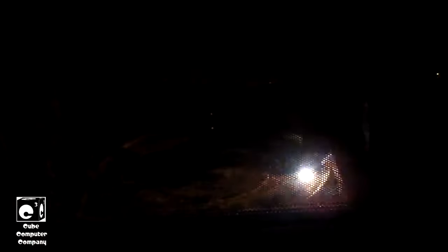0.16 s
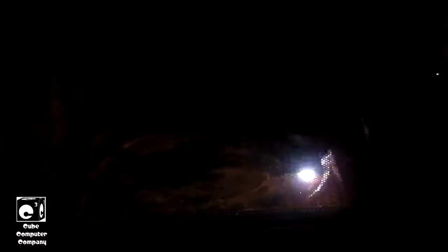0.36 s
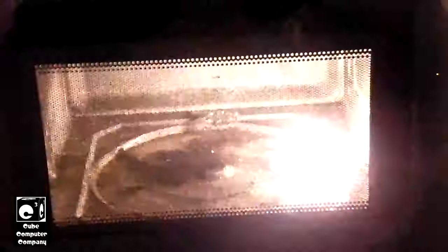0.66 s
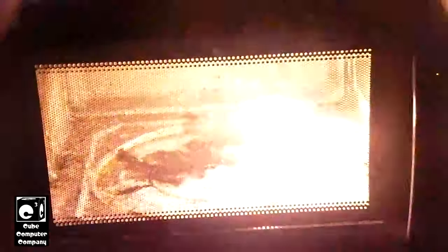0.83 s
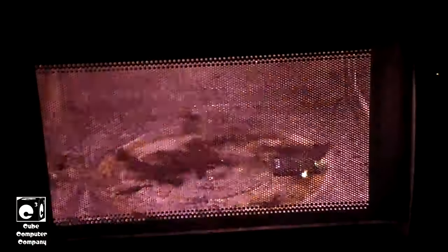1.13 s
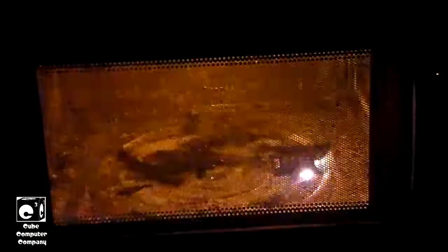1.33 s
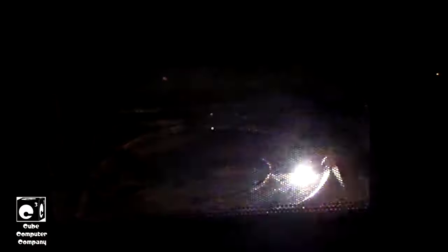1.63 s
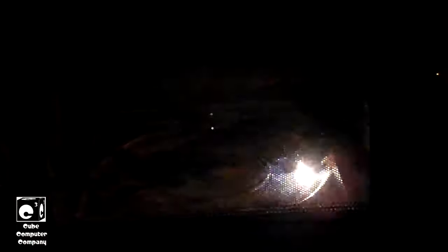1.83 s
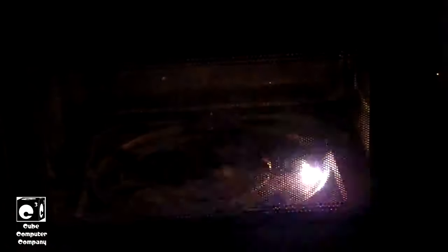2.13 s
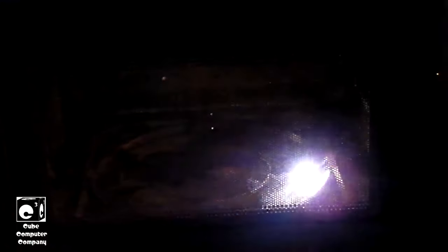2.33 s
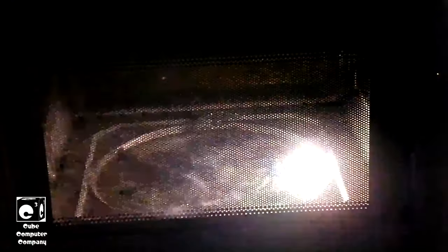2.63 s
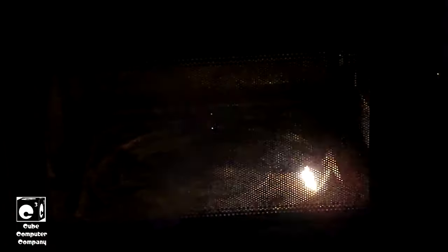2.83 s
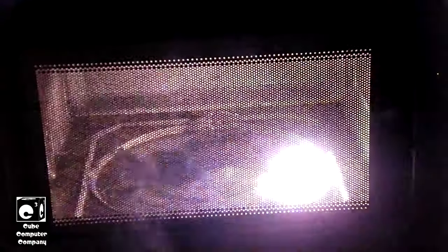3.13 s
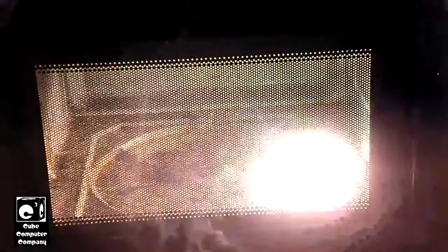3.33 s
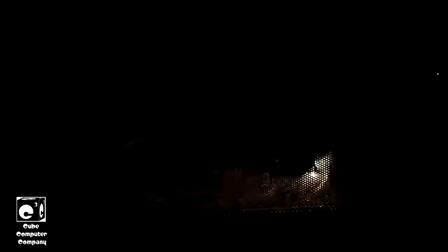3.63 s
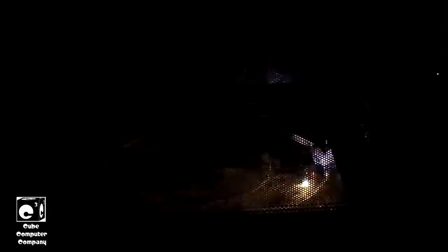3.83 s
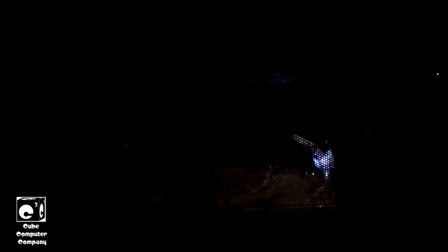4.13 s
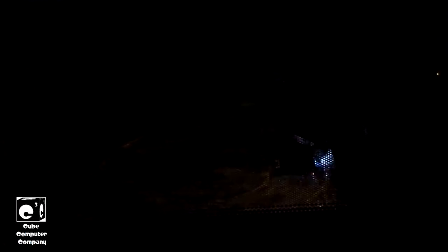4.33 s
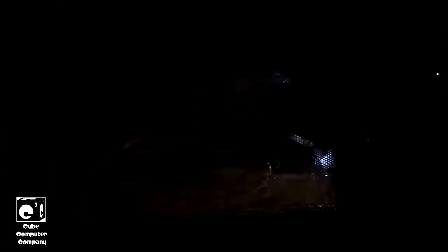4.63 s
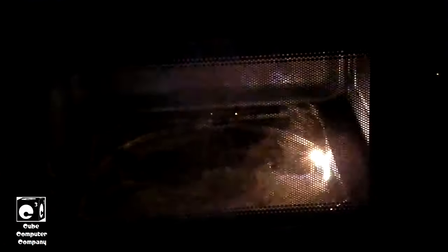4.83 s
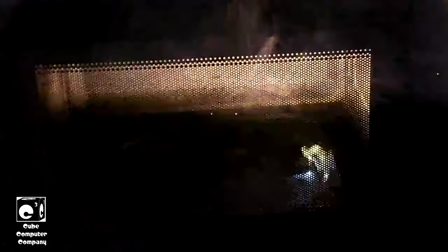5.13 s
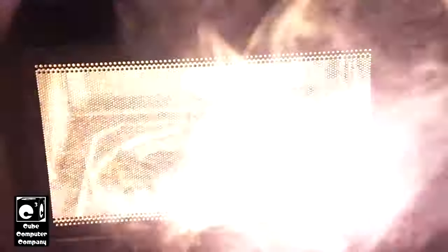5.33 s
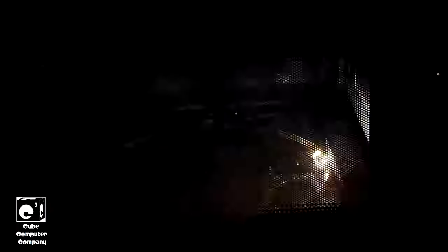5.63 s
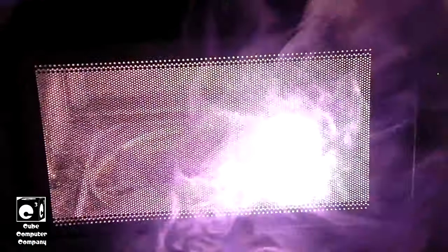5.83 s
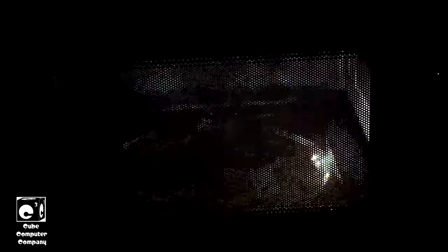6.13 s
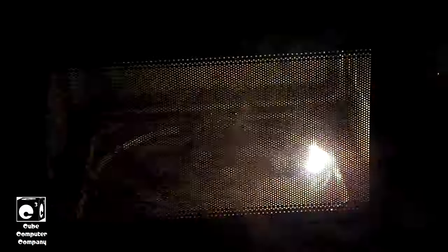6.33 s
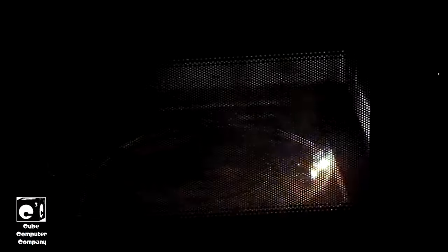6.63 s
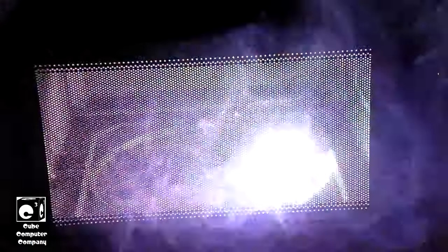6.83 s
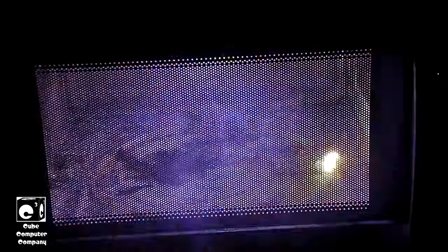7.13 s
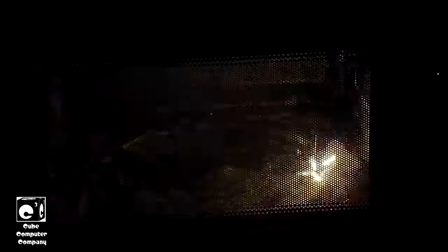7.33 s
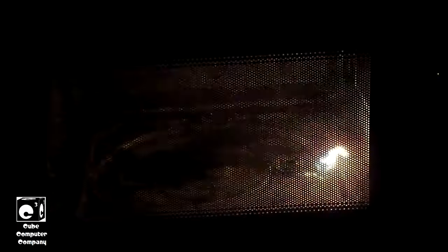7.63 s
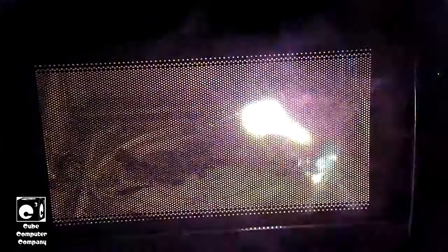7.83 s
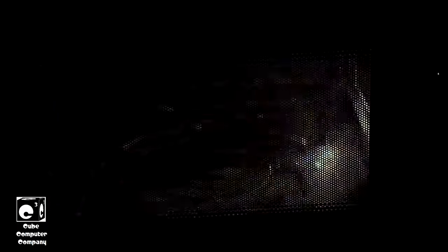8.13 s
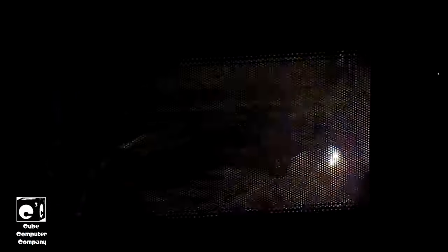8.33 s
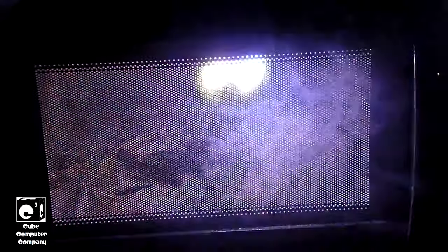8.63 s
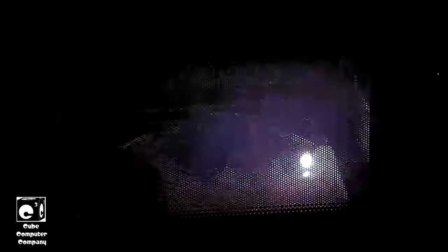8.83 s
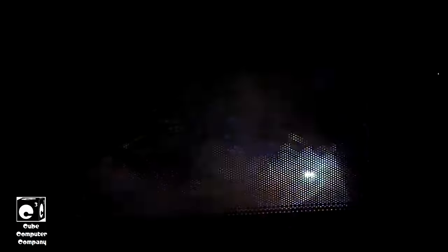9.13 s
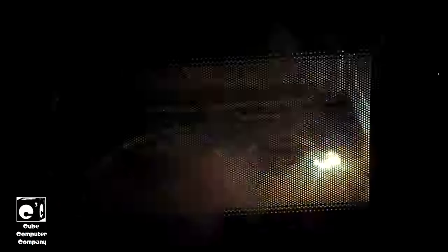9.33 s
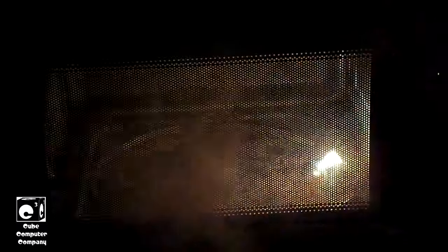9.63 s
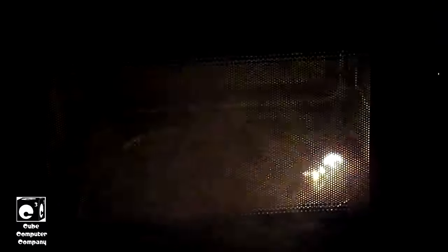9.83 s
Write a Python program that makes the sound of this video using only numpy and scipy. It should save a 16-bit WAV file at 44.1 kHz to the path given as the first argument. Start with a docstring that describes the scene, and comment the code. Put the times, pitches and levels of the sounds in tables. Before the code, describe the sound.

Metal arcs inside a running microwave oven, heard close to the door. From the start, bright sparks sizzle in a rapid pulse over a low fan hum, ringing briefly in the steel box. Loud, irregular cracks stand out as the arc falters and strikes again. Now and then a ball of plasma swells into a low electrical buzz, most often in the second half. Sparks and fan continue to the end.

```python
"""Metal arcs in a running microwave oven, heard close to the door by a small stereo microphone.
From the start the fan hums and sparks ring in the steel cavity, 60 bursts a second: the magnetron is on
for part of every mains cycle. From 0.3 s loud cracks stand out; the arc often starves and strikes again.
From 0.8 s to 8.8 s, now and then, a plasma ball swells once a cycle and buzzes.
Sparks and fan run on to the end at 10 s."""
import sys
import numpy as np
from scipy import signal
from scipy.fft import rfft, irfft
from scipy.io import wavfile
from scipy.ndimage import uniform_filter1d

SR = 44100
rng = np.random.default_rng(int(sys.argv[2]) if len(sys.argv) > 2 else 0)


def unload_wav(signal):
    """Save mono or channel-first audio to the path in sys.argv[1] as 16-bit WAV at rate SR, clipped to [-1, 1]."""
    wavfile.write(
        sys.argv[1],
        SR,
        np.round(np.clip(np.atleast_2d(signal).T, -1, 1) * 32767).astype(np.int16),
    )


N = 439677
TIME_S = np.arange(N) / SR

# arc strength (time [s], relative level [dB], treble gain [dB])
ARC_LEVELS = [(0.0, -15, 1.5), (0.55, -23, 3), (1.0, -13, -0.5), (1.2, -19.5, 0), (1.4, -15.5, 1.5),
              (1.66, -16, 3), (1.97, -24, 2.5), (2.3, -16, 4), (3.1, -23, 0), (3.45, -13.5, 1),
              (3.62, -26, -4), (3.9, -21, 5.5), (5.0, -14.5, 4), (5.5, -20.5, 1), (6.1, -16.5, 2),
              (6.34, -13, 2.5), (6.66, -21, 3), (6.85, -14, 1.5), (7.39, -15, 3.5), (7.7, -22, 3),
              (7.85, -16, 1.5), (8.94, -19, 1), (9.3, -14, 3.5), (9.5, -24, 4.5), (9.97, -18, 2)]
# strongest bursts, relative levels (time [s], upper band [dB], low band [dB], thump [dB])
CRACKS = [(0.324, -13, -29, -60), (0.409, -5, 2, -35), (0.445, -4.5, 1.5, -36), (0.625, -3, 4, -27),
          (0.6724, -11.5, -14, -46), (0.7743, -3.5, 10.5, -26), (0.859, -5.5, 5.5, -35),
          (0.91, -12, -15, -32), (1.108, -8, -17, -45), (1.2392, -11.5, 3.5, -31), (1.3403, -5, 5, -26),
          (1.36, -3, 6.5, -24.5), (1.5114, -20, 4.5, -37), (1.5272, -9, -22, -33), (1.9918, -7, 1, -37),
          (2.0232, -8.5, 0.1, -32), (2.2063, -7.5, -1, -41), (2.273, -8, -8, -51), (2.7759, -7.5, 4, -28.5),
          (2.9916, -11, -8, -37), (3.1556, -9, -10, -58), (3.225, -5, 2, -31), (3.2556, -12.5, 3.3, -41),
          (3.3744, -10, -2, -39), (3.407, -17, 0, -30), (3.5114, -5, 4.5, -22), (3.658, -11.5, -6, -36),
          (3.675, -8, -5, -31), (3.7907, -4.5, 2, -31.5), (3.826, -7.5, -4, -52), (3.8396, -8.5, -7, -43),
          (3.8744, -13, -5, -35.5), (3.925, -14.5, -19, -54), (3.994, -10, -17, -54),
          (4.026, -8.5, -22, -46), (4.043, -12, -24, -50), (4.074, -10.5, -27, -48), (4.1552, -8, -24, -57),
          (4.188, -9, -15, -56), (4.556, -10.5, -30, -58), (4.608, -6.5, 2.2, -38), (4.905, -6.5, 2, -30),
          (5.0392, -8.5, -18, -36), (5.1246, -9.5, -2, -46), (5.1556, -4.5, -18, -45),
          (5.207, -6.5, 6, -32), (5.2402, -7.5, 1, -28), (5.3729, -5, 8, -44), (5.4058, -13, 7, -31),
          (5.44, -5, -28, -33), (5.4898, -7.5, -4, -36), (5.6256, -8, 4.5, -42), (5.6577, -6, 4.5, -26),
          (5.726, -8, -25, -33), (5.8224, -6, 2.5, -30), (5.892, -4, 4, -33), (6.2413, -9, -18, -29),
          (6.293, -2, 4.5, -26.5), (6.3904, -5, 8, -19.5), (6.8918, -14, -1.5, -37),
          (6.9562, -0.5, 7.5, -44), (7.1422, -6.5, -17, -25.5), (7.2395, -15, -16, -35),
          (7.3572, -14, -3, -28), (7.443, -17, 5.5, -35.5), (7.7268, -8.5, -21, -53),
          (7.8078, -13, 2.5, -48), (7.8219, -2.5, 7.5, -59), (8.0094, -27, -18, -22),
          (8.2217, -22, -25, -56), (8.3435, -25, -24, -57), (8.391, -7, -8, -52), (8.523, -9, 4, -49),
          (8.554, -5.5, 7.5, -41), (8.6747, -7.5, -8, -32), (8.8083, -7, -9, -36), (8.9729, -1.5, 8.5, -32),
          (9.0403, -3, -3, -34), (9.1243, -5, -17, -56), (9.2084, -21, -19, -56), (9.3893, -13, -25, -61),
          (9.5235, -10.5, -5, -44), (9.823, -7, -2.5, -52), (9.8583, -5, 1, -38)]
# ramps before a new strike (strike time [s], length [s], level change reached [dB])
LULLS = [(0.405, 0.082, 1.5), (0.62, 0.08, 3.5), (0.785, 0.028, -9), (0.85, 0.063, -2.5),
         (1.1, 0.079, -18.5), (1.312, 0.15, -9), (2.195, 0.1, -4.5), (3.224, 0.035, 0), (3.375, 0.07, -10),
         (3.788, 0.06, -17), (3.977, 0.037, -4), (4.144, 0.16, -5.5), (4.6, 0.092, -15), (5.155, 0.02, -7),
         (5.445, 0.044, -22), (5.627, 0.05, -10), (5.887, 0.035, -8), (6.058, 0.045, -14),
         (6.947, 0.027, -11), (7.804, 0.044, -19), (8.213, 0.066, -8.5), (8.33, 0.075, -13),
         (7.724, 0.055, -4), (8.506, 0.08, -7), (9.038, 0.04, -8), (8.664, 0.081, -6.5), (8.812, 0.04, -35),
         (9.119, 0.04, -10), (9.397, 0.057, -27), (9.832, 0.38, -3), (3.307, 0.054, -8), (1.23, 0.064, 1),
         (2.986, 0.28, -1.5), (5.823, 0.065, 1)]
# spark spectrum (frequency [Hz], relative density [dB])
SPARK_SPECTRUM = [(180, -36.5), (300, -26.5), (762, -22.5), (828, -22), (1060, -22.5), (1320, -21),
                  (2170, -11.5), (2930, -12), (3400, -3), (4830, -0.5), (7690, -4), (12900, -3.5),
                  (16000, -7)]
# plasma balls (start [s], length [s], buzz level [dB], drift over length [dB], upper harmonic gain [dB])
PLASMA_BALLS = [(0.805, 0.56, -25, -7.5, -4.5), (1.347, 0.17, -27.5, -6.5, 2), (1.996, 0.076, -29.5, -6, 7),
                (3.24, 0.14, -23, -3.5, 0.5), (3.426, 0.15, -25.5, 4.5, -3.5), (5.165, 0.1, -31, -9, -13),
                (5.373, 0.058, -20.5, -4, -14), (5.449, 0.15, -31, 10, 0.5), (5.929, 0.33, -21.5, -1, -3.5),
                (6.348, 0.086, -24, -1, -5), (7.006, 0.33, -24, -5.5, -5), (7.296, 0.17, -19.5, -10.5, 3),
                (7.831, 0.17, -24, -6.5, 1.5), (7.996, 0.065, -18.5, -6, 2.5), (8.071, 0.14, -23.5, 0.1, 4),
                (8.579, 0.25, -18.5, -5, -3.5)]
# buzz spectrum (mains harmonic [1], relative level [dB])
BUZZ_HARMONICS = [(1, -10.5), (2, -4), (3, 6.5), (4, -4), (5, -12.5), (6, -24.5), (7, -28.5), (8, -14),
                  (9, -8.5), (10, -9.5), (11, -10.5), (12, -15.5), (13, -15.5), (14, -18.5), (15, -66),
                  (16, -21), (17, -12.5), (18, -34), (19, -26), (20, -42), (21, -47), (22, -15), (23, -20),
                  (24, -47), (25, -21), (26, -18), (27, -38), (28, -22), (29, -51), (30, -31), (31, -34),
                  (32, -18), (33, -29)]
# sharp modes of the steel box (frequency [Hz], width [Hz], gain [dB])
CAVITY_MODES = [(829.6, 18.6, 12), (1056, 16, 8.5), (1330, 130, 7), (1570, 7.1, 7), (2211, 51, 6),
                (2610, 115, 6), (2984, 173, 8), (3750, 94, 2), (4820, 210, 3), (6135, 290, 4.5)]
# cavity decay (frequency [Hz], T60 [s])
CAVITY_DECAY = [(300, 0.086), (2000, .11), (6000, 0.12), (14000, 0.12)]
# blade and transformer tones (frequency [Hz], rms level [dB])
FAN_TONES = [(120, -56.5), (170.3, -45), (240, -60.5), (511, -64), (600, -65), (720, -75)]
# rushing air (frequency [Hz], relative density [dB])
AIR_SPECTRUM = [(15, -83), (25, -3), (117, -5.5), (171, -2.5), (218, -2), (381, -13.5), (1190, -26.5),
                (1350, -38), (1490, -59), (3000, -10.5), (3900, -64), (6600, -120)]
# microphone port imbalance (frequency [Hz], left minus right [dB])
PORT_BALANCE = [(60, 11), (180, 11.5), (550, 10.5), (1650, 8), (4970, 1.0), (15000, -4)]

MAINS_HZ = 60.0


def arc():
    """Sparks surge while the magnetron is on; strength, strike moment and colour change every cycle."""
    cycles = TIME_S * MAINS_HZ
    cycle, phase = cycles.astype(int), cycles % 1
    strength, lateness, low_spread, treble_spread = rng.standard_normal((cycle[-1] + 1, 4)).T[:, cycle]
    strike_phase, quench_phase = 0.375 + 0.045 * abs(lateness), 0.93
    gate = np.clip((phase - strike_phase) / 0.09, 0, 1) * np.clip((quench_phase - phase) / 0.28, 0, 1)
    gate += 0.25  # hot metal fizzes on
    knots_s, level_db, treble_db = np.transpose(ARC_LEVELS)
    level_db, treble_db = np.interp(TIME_S, knots_s, level_db), np.interp(TIME_S, knots_s, treble_db)
    lull_db = starving_db(TIME_S)
    upper_level = gain_of(level_db + 2.4 * strength + lull_db) * gate
    # a plasma ball makes sparks fatter and duller; if the arc starves they fatten more and regain treble
    ball = np.max([ball_growth(TIME_S, start_s, length_s) for start_s, length_s, *_ in PLASMA_BALLS], 0)
    low_db = 3.5 + (7 - 0.35 * lull_db) * ball - 0.4 * treble_db  # bright sparks are thinner
    low_level = upper_level * gain_of(low_db + 1.5 * low_spread)
    treble_db += (-3.5 - 0.3 * lull_db) * ball + 1.8 * treble_spread
    # many small sparks, few large ones
    sparks = unit_rms(rng.standard_normal(N) * gain_of(2.72 * np.minimum(rng.exponential(1, N), 6)))
    sparks = unit_rms(coloured(sparks, lambda hz: curve_at(SPARK_SPECTRUM, hz)))
    low = signal.sosfilt(signal.butter(2, 2500, fs=SR, output="sos"), sparks)
    treble = signal.sosfilt(signal.butter(2, 8000, "high", fs=SR, output="sos"), sparks)
    upper = sparks - low + treble * (gain_of(treble_db) - 1)
    upper_crack, low_crack = crack_envelopes()
    return np.hypot(upper_level, upper_crack) * upper + np.hypot(low_level, low_crack) * low


def crack_envelopes(rise_s=0.00064, fall_s=0.0055):
    """Brief flares of the arc: upper and low band envelopes."""
    at_s, upper_db, low_db, _ = np.transpose(CRACKS)
    age_s = np.arange(700) / SR
    flare = (1 - np.exp(-age_s / rise_s)) * np.exp(-(age_s / fall_s) ** 2)
    return [signal.oaconvolve(impulses(at_s, gain_of(db)), flare)[:N] for db in (upper_db, low_db)]


def starving_db(time_s):
    """The arc starves: a level ramp, mostly downward, that resets at each strike."""
    return sum(np.interp(time_s, [strike_s - length_s, strike_s], [0, change_db], 0, 0)
               for strike_s, length_s, change_db in LULLS)


def plasma(edge_db=-15.5, sharpen_db_per_s=18, sputter_db=2.5, null_hz=390):
    """One flat-topped pressure pulse per cycle; cracks knock the same low modes."""
    pulse_s = (np.arange(int(N / SR * MAINS_HZ)) + 0.765) / MAINS_HZ
    count = len(pulse_s)
    low, upper = np.zeros((2, count))
    for start_s, length_s, buzz_db, drift_db, upper_db in PLASMA_BALLS:
        grown = ball_growth(pulse_s, start_s, length_s)
        age_s = np.clip(pulse_s - start_s, 0, length_s)
        buzz = (grown > 0) * gain_of(buzz_db + drift_db * age_s / length_s + edge_db * (1 - grown))
        low += buzz
        upper += buzz * gain_of(upper_db + sharpen_db_per_s * age_s)
    arc_db = np.interp(pulse_s, *np.transpose(ARC_LEVELS)[:2]) + starving_db(pulse_s)
    low += gain_of(arc_db - 36 + 5 * rng.standard_normal(count))  # the arc's own faint pulse
    wobble = gain_of(1.1 * rng.standard_normal((count, 2)).T)
    wobble *= gain_of(sputter_db * unit_rms(uniform_filter1d(rng.standard_normal(count), size=3)))
    harmonics = [(k * MAINS_HZ, db) for k, db in BUZZ_HARMONICS]
    colour_db = lambda hz: curve_at([(45, -67)] + harmonics + [(2500, -32), (5000, -29)], hz)
    train_rms = np.std(coloured(impulses(pulse_s, np.ones(count)), colour_db))
    hz = np.fft.rfftfreq(N, 1 / SR)
    low_spectrum, upper_spectrum = (rfft(impulses(pulse_s, sizes)) for sizes in wobble * [low, upper])
    # harmonics change sign above the flat top's first null
    spectrum = np.where(hz < null_hz, low_spectrum, -upper_spectrum)
    pulses = irfft(spectrum * gain_of(colour_db(hz)), N)
    crack_s, _, _, thump_db = np.transpose(CRACKS)
    thumps = coloured(impulses(crack_s, gain_of(thump_db)), colour_db)
    return (pulses + thumps) / train_rms


def ball_growth(time_s, start_s, length_s, collapse_s=0.042):
    """Plasma ball size, 0 to 1: it grows, then collapses; long-lived balls grow slower."""
    grow_s = 0.01 + 0.1 * length_s
    return np.clip(np.minimum((time_s - start_s) / grow_s, (start_s + length_s - time_s) / collapse_s), 0, 1)


def cavity(source, wet_db=0.5, places=4):
    """Steel box: sharp modes, then sparse reflections, different for each place the arc jumps to."""
    direct = coloured(source, lambda hz: sum(bell_db(hz, *mode) for mode in CAVITY_MODES))
    taps = np.zeros((places, 3, SR // 4))  # shared, left, right
    slots = np.arange(20, SR // 4 - 10, 10)
    shape = (places, 3, len(slots))
    np.put_along_axis(taps, slots + rng.integers(0, 10, shape), rng.choice([-1., 1.], shape), 2)
    hz, age_s, bands = signal.stft(taps, SR, nperseg=128)
    decay = gain_of(-60 * age_s / curve_at(CAVITY_DECAY, hz)[:, None])
    tails = signal.istft(bands * decay, SR, nperseg=128)[1]
    place = rng.integers(0, places, N)[(TIME_S * MAINS_HZ).astype(int)]  # one draw per cycle
    wet = np.zeros((2, N))
    for k, tail in enumerate(tails):
        response = tail[0] + tail[1:]
        response /= np.linalg.norm(response[0])
        wet += signal.oaconvolve((direct * (place == k))[None], response, axes=1)[:, :N]
    return direct + gain_of(wet_db) * wet


def fan(waver_db=0.43, shared_air_db=-50.5):
    """Wavering blade and transformer tones over rushing air that differs between the ports."""
    waver = unit_rms(uniform_filter1d(uniform_filter1d(rng.standard_normal(N), 9000), 9000))
    tones = sum(np.sqrt(2) * gain_of(db + waver_db * waver) * np.sin(2 * np.pi * (hz * TIME_S + rng.random()))
                for hz, db in FAN_TONES)
    shared, left, right = (unit_rms(coloured(noise, lambda hz: curve_at(AIR_SPECTRUM, hz)))
                           for noise in rng.standard_normal((3, N)))
    return tones + gain_of(shared_air_db) * (shared + 0.86 * np.array([left, right]))


def gain_of(db):
    """Decibels to amplitude."""
    return 10 ** (np.asarray(db) / 20)


def unit_rms(x):
    """Scale to rms 1."""
    return x / np.sqrt(np.mean(x ** 2) + 1e-20)


def curve_at(points, hz):
    """Interpolate a table over log frequency."""
    knots_hz, values = np.transpose(points)
    return np.interp(np.log(hz + 1), np.log(knots_hz + 1), values)


def bell_db(hz, centre_hz, width_hz, peak_db):
    """Resonance peak or notch."""
    return peak_db / (1 + (2 * (hz - centre_hz) / width_hz) ** 2)


def coloured(x, db_at, size=8192):
    """Minimum-phase filter with gain db_at(hz)."""
    hz = abs(np.fft.fftfreq(size, 1 / SR))
    log_gain = np.log(gain_of(np.maximum(db_at(hz), -100)))
    taps = np.fft.ifft(np.exp(log_gain - 1j * signal.hilbert(log_gain).imag)).real[:size // 2]
    return signal.oaconvolve(x, taps)[:N]


def impulses(at_s, sizes):
    """Single samples at the given times."""
    return np.bincount(np.round(np.asarray(at_s) * SR).astype(int), sizes, N + SR)[:N]


def scene():
    """Arc in its cavity, plasma buzz, fan."""
    return gain_of(-3.5) * cavity(arc()) + plasma() + fan()


def record(dry, limit_hz=15900):
    """Microphone: right port weak in bass, narrow notch on both, soft overload, band limit."""
    def port_db(hz, side):
        imbalance_db = -20 * np.log10(0.5 + 0.5 * gain_of(-side * curve_at(PORT_BALANCE, hz)))
        return imbalance_db + bell_db(hz, centre_hz=7920, width_hz=300, peak_db=-8.5)

    ports = [coloured(x, lambda hz: port_db(hz, side)) for x, side in zip(dry, (1, -1))]
    saturated = 1.094 * np.tanh(np.array(ports) / 1.187)
    lowpass = signal.firwin(511, limit_hz, window=("kaiser", 9), fs=SR)
    return signal.oaconvolve(saturated, lowpass[None], "same")


dry = scene()
out = record(dry)
unload_wav(out)
```